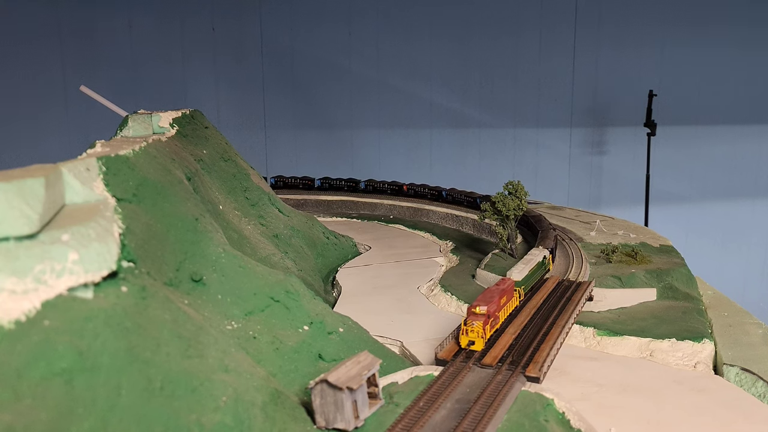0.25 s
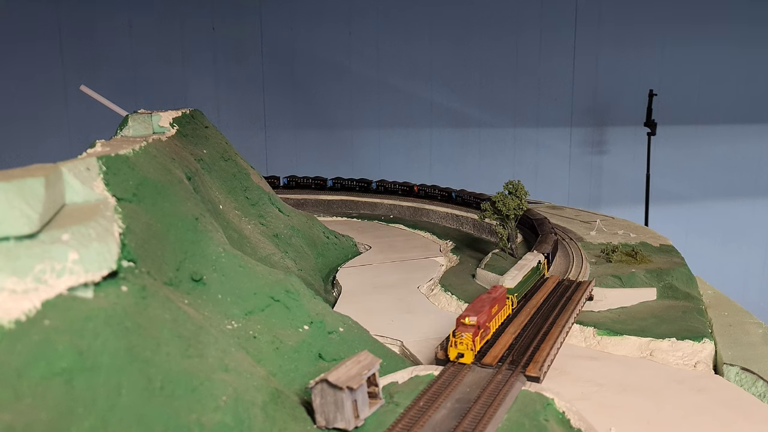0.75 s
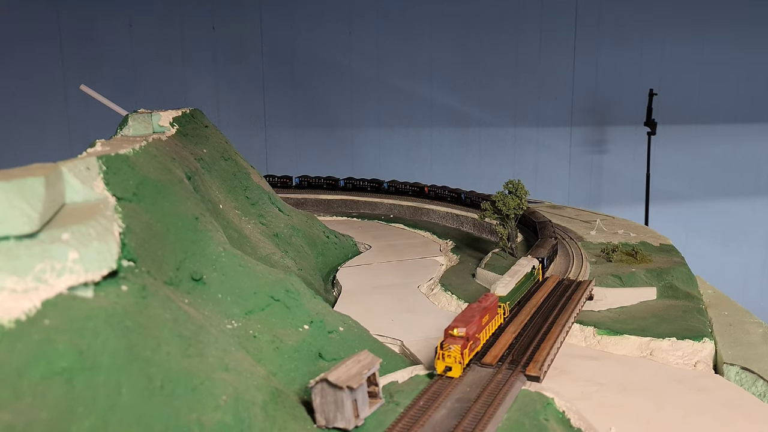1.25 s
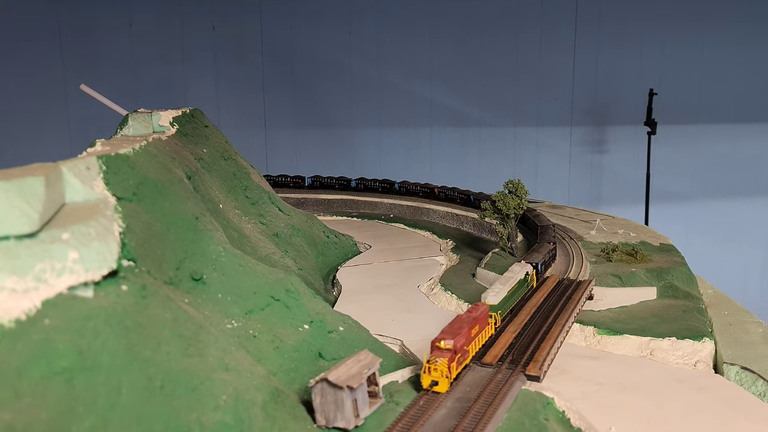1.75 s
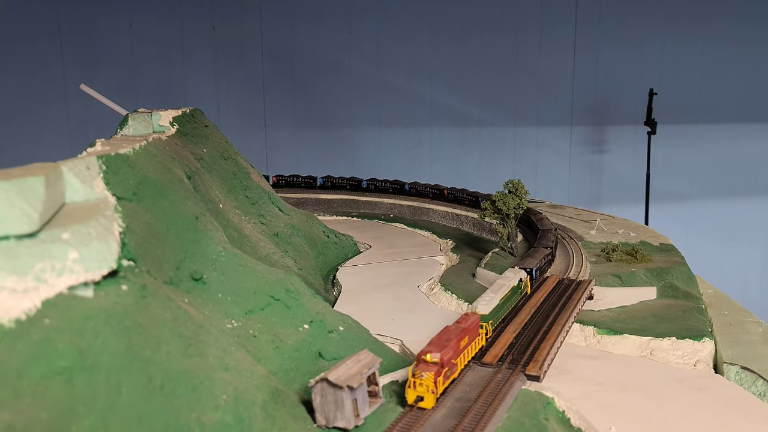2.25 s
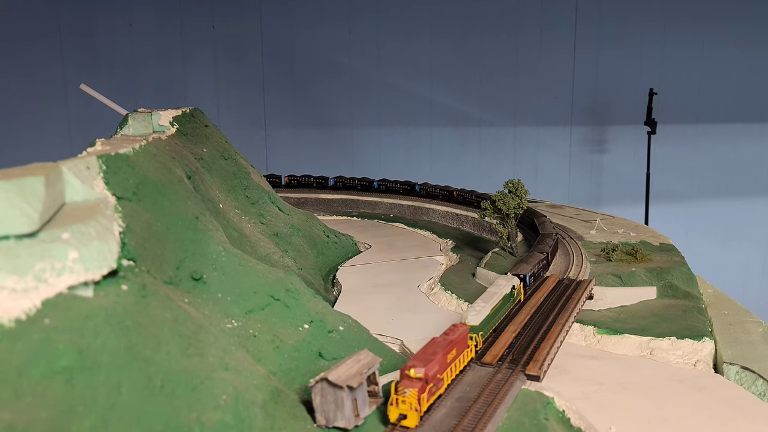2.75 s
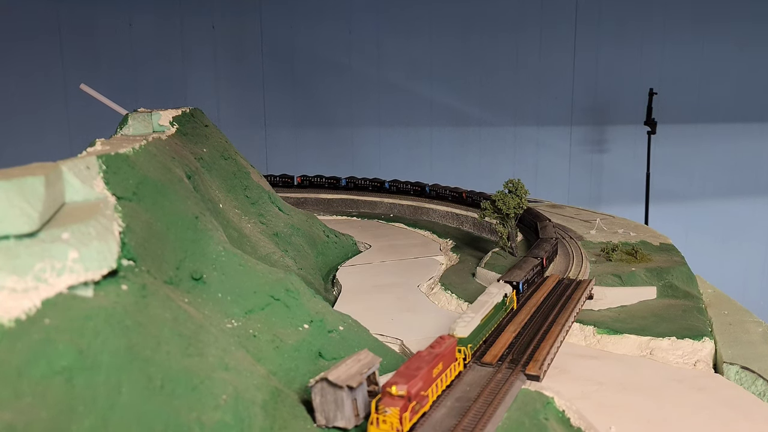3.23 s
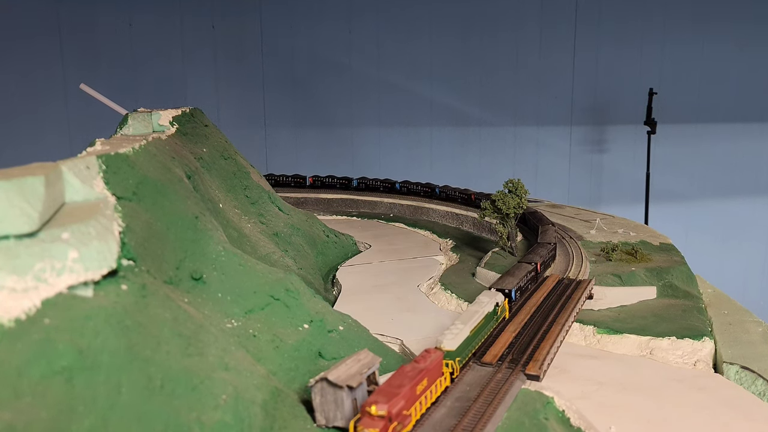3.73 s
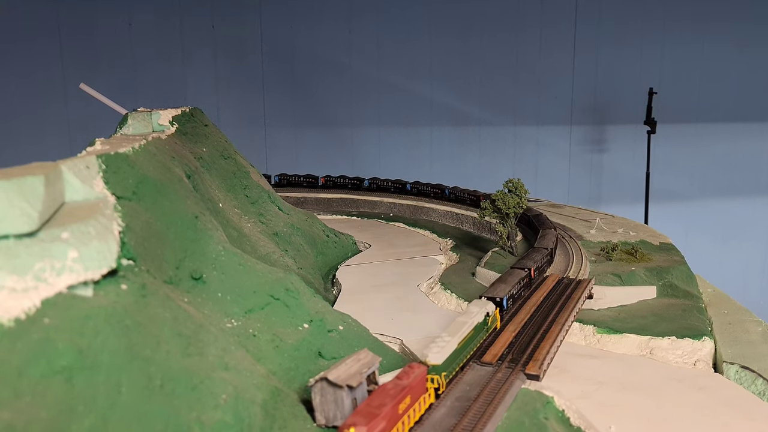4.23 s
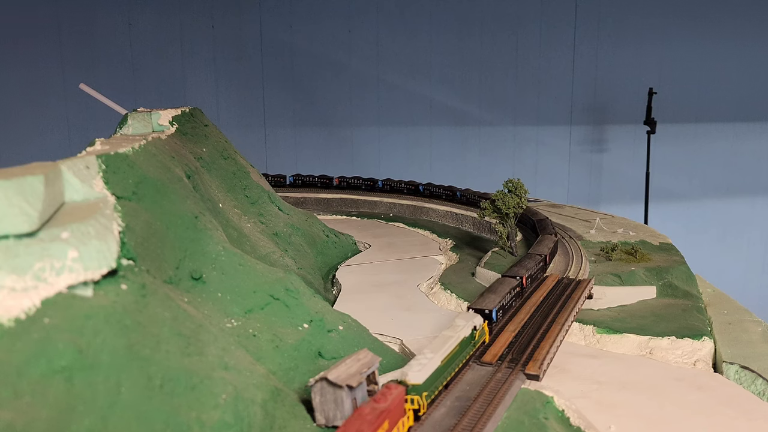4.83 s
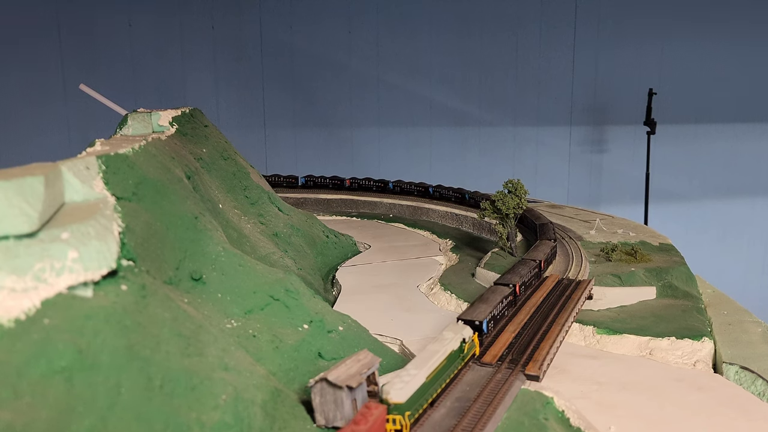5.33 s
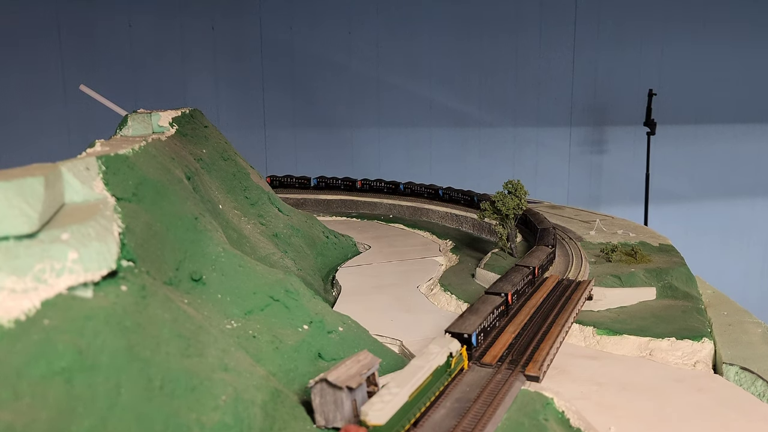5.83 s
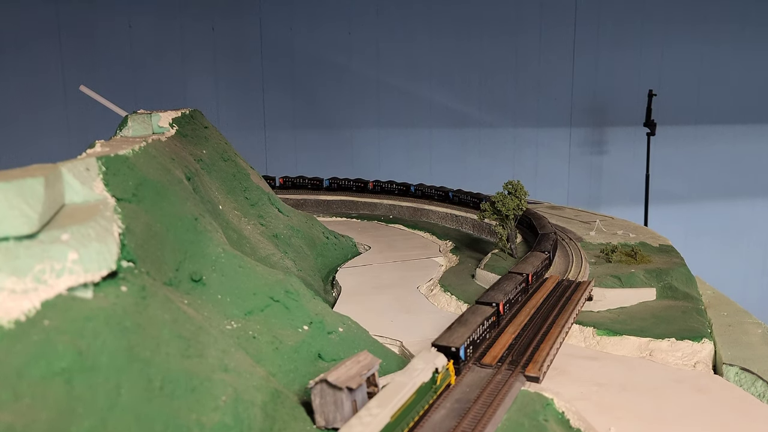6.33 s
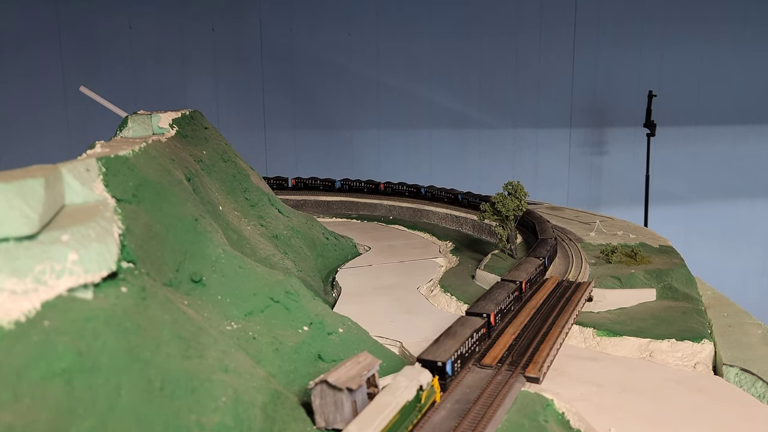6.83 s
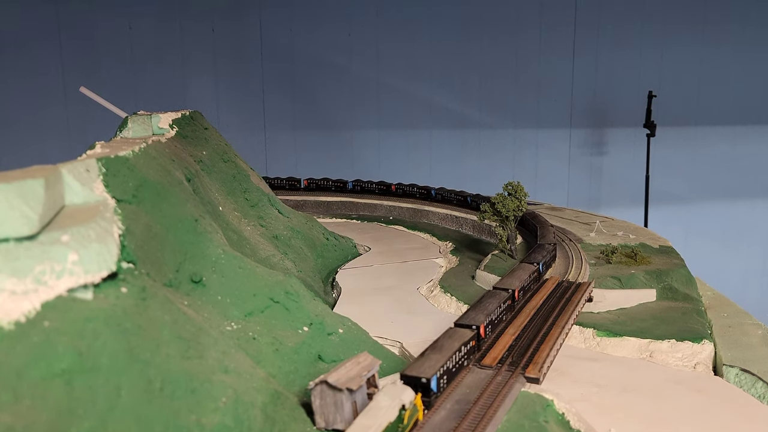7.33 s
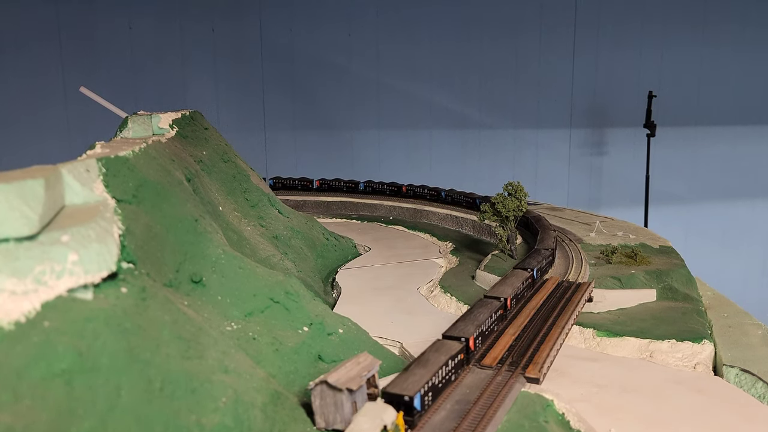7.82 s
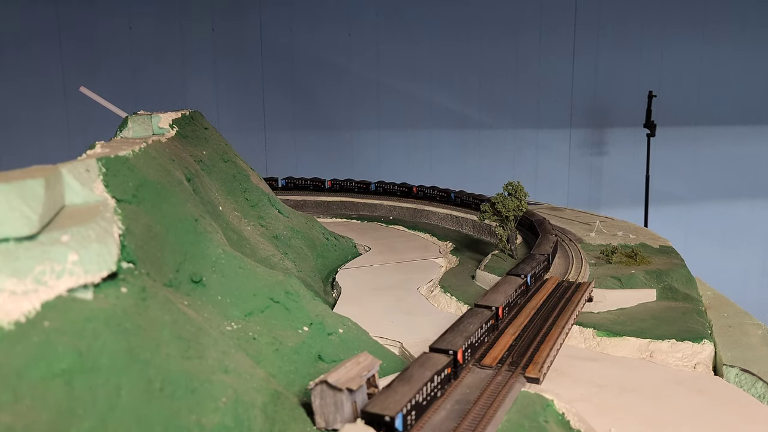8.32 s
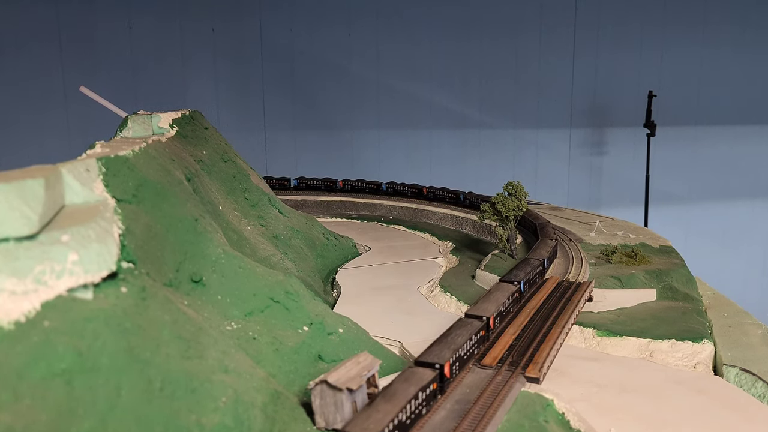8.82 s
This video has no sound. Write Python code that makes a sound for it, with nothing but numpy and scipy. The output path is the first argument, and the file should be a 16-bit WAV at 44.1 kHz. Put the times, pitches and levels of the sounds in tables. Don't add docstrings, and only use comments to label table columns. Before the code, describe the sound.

A small electric model train whirs and rattles steadily closer, its gears hissing and plastic shell buzzing, with soft rail-joint bumps and a few dry ticks.

```python
import sys
import numpy as np
from scipy import signal
from scipy.fft import rfft, irfft, next_fast_len
from scipy.io import wavfile
from scipy.ndimage import uniform_filter1d, map_coordinates

SR = 44100
rng = np.random.default_rng(int(sys.argv[2]) if len(sys.argv) > 2 else 0)


def volts_from_db(level):
    exponent = np.asarray(level, float) / 20
    return 10 ** exponent


def generate_wav(signal):
    frames = np.transpose(np.atleast_2d(signal))
    scaled = np.clip(frames, -1, 1) * 32767
    pcm = np.round(scaled).astype(np.int16)
    wavfile.write(sys.argv[1], SR, pcm)


N = 399987
HOP = 512
SIDES = np.array([[.5], [-.5]])  # left, right share of a left-right dB difference


def unit(x):
    return x / np.sqrt(np.mean(x ** 2) + 1e-20)


def curves(rows):
    s, *cols = np.transpose(rows)
    return [np.interp(np.arange(N) / SR, s, c) for c in cols]


def along(points, hz):
    f, v = np.transpose(points)
    return np.interp(np.log(hz + 1), np.log(f + 1), v)


def wobble(rate_hz):
    coarse = np.arange(0, N + 16, 16)
    knots = rng.standard_normal(int(N * rate_hz / SR) + 4)
    return np.interp(np.arange(N), coarse, map_coordinates(knots, [coarse * rate_hz / SR]))


def filtered(x, response):
    m = next_fast_len(N + 8192)
    return irfft(rfft(x, m) * response(np.fft.rfftfreq(m, 1 / SR)), m)[..., :N]


def patches(shape, hz_bins, frames):
    field = rng.standard_normal(shape)
    for _ in range(2):
        field = uniform_filter1d(field, int(hz_bins), 1)
        field = uniform_filter1d(field, int(frames), 2)
    return unit(field)


APPROACH = {"worm": (-38, -36, -1, -4), "gears": (-34.5, -31.5, 8.5, 0.5),
            "brushes": (-44.5, -43.5, -1, -5), "wheels": (-50.5, -49, -0.5, 1.5),
            "board": (-43, -41.5, -4.5, 0.5), "rumble": (-53.5, -50.5, 0.5, 0)}
SWINGS = {"worm": [(4.4, 0.44, -2.5, 0.5), (6.0, 0.61, -.5, -3.5)], "gears": [(.2, 1, -4, -3),
          (3.2, 0.43, 0, -4.5), (4.9, 0.55, -3, -2)], "brushes": [(4.0, 0.95, 2.5, 7.5),
          (6.0, 1.7, 4.5, 9)], "wheels": [(2.5, 1.6, -1.5, -1.5), (7.5, 1.2, 4.5, 3.5)],
          "board": [(1.5, .55, -2, 0), (5.9, .9, 1, -1.5)], "rumble": [(3.5, 0.85, 1.5, 0),
          (6.6, 0.49, 1.5, 0)]}


def heard_as(part):
    t = np.arange(N) / SR
    first_db, last_db, first_pan, last_pan = APPROACH[part]
    level_db = first_db + (last_db - first_db) * t / t[-1]
    pan_db = first_pan + (last_pan - first_pan) * t / t[-1]
    for s, half_s, gain_db, swing_db in SWINGS[part]:
        bell = np.exp(-((t - s) / half_s) ** 2)
        level_db, pan_db = level_db + gain_db * bell, pan_db + swing_db * bell
    return level_db, pan_db


def hum():
    hum_hz, level_db = 120, -54.0 + 0.34 * wobble(5)
    phase = 2 * np.pi * hum_hz * np.arange(N) / SR + 0.37 * wobble(6)
    return volts_from_db(level_db) * np.sqrt(2) * np.sin(phase)


# (frequency [Hz], density [dB per Hz])
RUMBLE_COLOUR = [(15, -63), (25, -20), (60, -7), (91, -7.5), (113, -7), (150, -4.5), (185, -9),
                 (496, -12.5), (625, -20.5), (800, -17), (1040, -47), (1760, -120)]
# (frequency [Hz], correlation [-1 to 1])
RUMBLE_ALIKE = [(40, 0.74), (120, 0.95), (300, 0.68), (700, 0.2)]


def rumble():
    lumps_db = 0.5

    def colour(hz):
        turn = np.arccos(np.clip(along(RUMBLE_ALIKE, hz), -1, 1)) / 2
        return volts_from_db(along(RUMBLE_COLOUR, hz)) * [np.cos(turn), np.sin(turn)]

    mid, side = filtered(rng.standard_normal((2, N)), colour)
    level_db, pan_db = heard_as("rumble")
    gain = volts_from_db(level_db + lumps_db * wobble(8.8) + SIDES * pan_db)
    return gain * unit(np.array([mid + side, mid - side]))


# (time [s], peak [dB], pitch [Hz], knock re bump [dB])
JOINTS = [(2.550, -37, 104, -22), (2.597, -29, 71.6, -27), (2.702, -40, 100, -21), (2.764, -35, 120, -22),
          (2.826, -38, 120, -18), (3.092, -35, 104, 5), (4.098, -38, 72, -18), (4.165, -41, 60, -16),
          (4.610, -31, 60, -14), (4.816, -34, 90, -16), (4.968, -31, 84, -20), (5.605, -32, 90, -20),
          (6.459, -28, 80, -22), (6.763, -37, 95, -20), (7.730, -35, 90, -22)]


def joint_bumps():
    out, t = np.zeros((2, N + SR)), np.arange(SR // 10) / SR
    left_db = 7
    for s, db, hz, knock_db in JOINTS:
        bump_gain = volts_from_db(db - 2.5 + SIDES * left_db - 60 * t / 0.083)
        bump = bump_gain * (1 - np.exp(-t / .005)) * np.sin(2 * np.pi * hz * t)
        knock_gain = volts_from_db(db + knock_db - 60 * t / 0.028)
        knock = knock_gain * (1 - np.exp(-t / .003)) * np.sin(2 * np.pi * 345 * t)
        out[:, round(s * SR):][:, :len(t)] += bump + knock
    return out[:, :N]


# (time [s], peak [dB])
TICKS = [
    (1.3004, -34),
    (3.2331, -29),
    (5.8396, -26.5),
]


def ticks():
    out, t = np.zeros((2, N + SR)), np.arange(SR // 10) / SR
    for s, db in TICKS:
        snap = np.diff(rng.standard_normal((2, len(t) + 1)), axis=1) * (1 - np.exp(-t / 0.00053))
        out[:, round(s * SR):][:, :len(t)] += volts_from_db(db - 1 - 60 * t / 0.023) * snap
    return out[:, :N]


# (frequency [Hz], width [Hz], level [dB], left-right [dB])
RAILS = [(1012, 14, -61, 0), (1099, 14, -61, 0), (1254, 8, -57, 0), (1350, 10, -55, 0), (1424, 10, -56, 0),
         (1794, 10, -50, 2), (1994, 10, -38, 5), (2525, 10, -47, 0), (3418, 14, -53, -4),
         (7323, 14, -52, -2)]


def rails(near):
    far_below_hz, fade_db = 1200, -9

    def lines(hz):
        total = 0
        for centre, width, db, pan_db in RAILS:
            line = np.sqrt(2 * SR / (np.pi * width)) / (1 + (2 * (hz - centre) / width) ** 2)
            total = total + volts_from_db(db + SIDES * pan_db) * line
        return total

    tones = filtered(rng.standard_normal(N), lines)
    far = filtered(tones, lambda hz: hz < far_below_hz)
    return tones - far + volts_from_db(2.5 + fade_db * near) * far


# (frequency [Hz], lead [rad])
LEAD = [(600, 0.58), (1100, -1.1), (1300, 0.89), (1750, 0.55), (1950, -1.5), (2700, -1.28), (3000, 1.94),
        (4400, 0.89), (4700, -1.77), (15000, -1.5)]
# (frequency [Hz], share [0-1])
ALIKE = [(700, 0.81), (1100, 0.8), (1450, 0.74), (1850, 0.41), (2250, 1), (2900, 0.32), (4000, 0.1),
         (4500, 0.74), (5200, 0.79), (6400, 0.47), (7000, 0.6), (7700, 0.25), (9000, 0.27), (14000, 0.14)]
# (time [s], half length [s], frequency [Hz], gain [dB])
GLINTS = [(.2, .4, 8000, -5), (.9, 0.78, 4830, 7), (1.2, 0.21, 6140, 12), (2.3, 0.72, 4070, 8),
          (2.5, .7, 5420, 3.5), (3.2, 0.49, 4850, 5.5), (3.3, 0.56, 2596, 10), (5.3, 0.56, 3970, 1),
          (5.6, 1.2, 7600, 4.5), (5.8, 0.52, 5560, -5), (6.5, 1.2, 2820, 6), (7.1, 1.6, 4250, -6.5),
          (7.5, .4, 3460, 4), (8, 1.8, 790, -10), (8.3, .6, 5660, 4), (8.4, 1.1, 2700, -6),
          (8.3, 1, 2030, -2.5), (4.6, .4, 2900, 4), (1.5, .8, 1400, -4), (4.6, .6, 4900, -4.5),
          (6.1, .5, 4900, -6), (6.9, .7, 6200, 2.5), (8, 0.51, 6460, 2.5), (8.2, .7, 5320, -3)]


def shaken(modes, level_db, pan_db, near, drive, echo, drift_db):
    lead_ms_per_s = .025
    glint_width, glint_slide_per_s = 0.039, -.022
    hz, t, z = signal.stft(drive * rng.standard_normal((3, N)), SR, nperseg=2 * HOP)
    at = np.minimum((t * SR).astype(int), N - 1)
    rows = (hz > modes[0][0] - 2500) & (hz < modes[-1][0] + 2500)
    hz, near = hz[rows, None], near[at]

    power = np.zeros((2, len(hz), len(t)))
    for centre, width, far_db, near_db, far_pan, near_pan in modes:
        mode_pan = far_pan + near * (near_pan - far_pan)
        mode_db = far_db + near * (near_db - far_db) + SIDES * mode_pan
        power += volts_from_db(2 * mode_db)[:, None] / (1 + (2 * (hz - centre) / width) ** 2) ** 1.99
    power *= volts_from_db(2 * drift_db * patches(power.shape, 3.1, 41))
    for s, half_s, centre, gain_db in GLINTS:
        off = (hz / centre - 1 - glint_slide_per_s * (t - s)) / glint_width
        power *= volts_from_db(2 * gain_db * np.exp(-off ** 2 - ((t - s) / half_s) ** 2))

    echo_ms = 2.6 + .15 * t + .3 * SIDES[:, None]
    depth = np.clip(echo * (1 + .7 * patches(power.shape, 15, 60)), 0, .9)
    power *= 1 + depth * np.cos(2 * np.pi * hz * echo_ms / 1e3)
    gain = np.sqrt(power / power.mean(axis=1, keepdims=True)) * volts_from_db(SIDES * pan_db[at])[:, None]

    phase = along(LEAD, hz) + 2 * np.pi * hz * lead_ms_per_s * t / 1e3
    share = np.clip(along(ALIKE, hz), 0, 1)
    cross = 2 * share * gain[0] * gain[1] * np.cos(phase)
    both = (gain[0] ** 2 + gain[1] ** 2 + cross).sum(axis=0) / (4 * HOP)
    direct = np.sqrt(share) * z[0, rows] * np.exp(1j * SIDES[:, None] * phase)
    ports = np.zeros_like(z[1:])
    ports[:, rows] = gain / np.sqrt(both) * (direct + np.sqrt(1 - share) * z[1:, rows])
    return volts_from_db(level_db) * signal.istft(ports, SR, nperseg=2 * HOP)[1][:, :N]


# (frequency [Hz], width [Hz], far level [dB], near level [dB],
# far left-right [dB], near left-right [dB])
BOARD = [(742, 205, -8, -15, 6, 2.4), (990, 266, -6, -16, -3, 7), (1327, 167, -7, -1.5, -10, -3.5),
         (1562, 365, 3, -1, -1.2, 3.5)]


def board(near, uneven):
    return shaken(BOARD, *heard_as("board"), near, unit(volts_from_db(0.15 * uneven)), echo=0.098, drift_db=1.7)


WHEELS = [(9270, 1050, -3.5, 3, 16.5, 8), (10550, 1100, -4.5, 7, -4, 8), (11590, 980, -7, 0, -10, -5),
          (12460, 910, -6, 0.5, 4, -3), (13500, 1100, -6.5, -9, -8, -6), (14500, 1300, -9.5, -9, -1, -4)]


def wheels(near, throb, grit):
    drive = unit(volts_from_db(0.3 * throb + 0.66 * wobble(8) + .8 * grit))
    return shaken(WHEELS, *heard_as("wheels"), near, drive, echo=0.41, drift_db=0.5)


BRUSHES = [(7344, 134, -2, -5.5, -3, 1), (7600, 1200, -10, -15, 0, 2), (8195, 180, -15, -19, -10, -15)]


def brushes(near, teeth):
    drive = unit(teeth * volts_from_db(0.83 * wobble(8.2)))
    return shaken(BRUSHES, *heard_as("brushes"), near, drive, echo=0.35, drift_db=3.5)


WORM = [(3036, 230, -1.5, -6, 3, 7), (3336, 315, -2.5, 9, 6.5, 3), (3782, 270, 1, 4.5, 18.5, -7),
        (4072, 206, 6, -14.5, -3.5, -17), (4417, 430, -5, -3, 28, -8)]


def worm(near, teeth):
    return shaken(WORM, *heard_as("worm"), near, teeth, echo=0.74, drift_db=2.2)


GEARS = [(4888, 366, 3.5, 0, 8.8, 6), (5465, 420, 6, -0.5, 1.6667, -20), (5953, 155, -1.5, 1.5, 23.3, 2.5),
         (6267, 370, -2.5, 13, 20, -25), (6603, 230, -4.5, -4.5, 21, 1)]


def gears(near, teeth):
    return shaken(GEARS, *heard_as("gears"), near, teeth, echo=.45, drift_db=1.7)


SHELL = [(1798, 144, -3.5, -18.5, 7, 9), (2088, 233, 3, -14, -14.5, 28.5), (2209, 167, -2.5, -5.5, -14, 14),
         (2269, 176, -11.5, 0, -4, -4.5), (2476, 144, -2, -12.5, -3, 15.5),
         (2747, 250, -8.5, -21.5, -14.5, 19.5)]
# (time [s], gain [dB])
JOLTS = [(1.06, 2), (2.14, 2.5), (4.22, 3), (4.68, 5), (4.88, 3), (4.97, 3), (5.025, 4), (5.29, 3),
         (5.38, 2.5), (5.46, 2.5), (6.425, 3), (6.49, 3), (6.84, 3), (7.45, 1.5), (7.58, 3.5), (8.18, 3),
         (8.36, 3), (8.917, 2), (8.944, 1.5)]


def shell(level_db, pan_db, near, facing, throb, uneven):
    surge_db, surge_growth, jolt_half_s = 0.74, .2, .015
    t = np.arange(N) / SR
    surges_db = surge_db * (1 + surge_growth * near) * wobble(28)
    for s, gain_db in JOLTS:
        surges_db = surges_db + gain_db * np.exp(-((t - s) / jolt_half_s) ** 2)
    drive = unit(volts_from_db(0.25 * throb + .5 * uneven))
    return shaken(SHELL, level_db + surges_db, pan_db, facing, drive, echo=0.24, drift_db=1.1)


# (time [s], level [dB], left-right [dB])
ENGINE = [(0, -31.5, .5), (.7, -34, 1), (1.0, -30, 0.5), (1.6, -30, -1), (2.3, -30, -1.5),
          (2.85, -30.5, -5), (3.9, -24.5, -2), (4.3, -23.5, -3), (4.55, -24, -2.5), (4.9, -22.5, -2.5),
          (5.7, -24, .5), (6.6, -23.5, 0), (7.4, -23, 0), (7.7, -22.5, -2), (8.05, -22, -5),
          (8.4, -20.5, -6.5), (9.07, -20, -8)]
# (time [s], nearness [0-1], shell turned to the ports [0-1])
PATH = [(0, 0.14, 0.16), (.7, 0.02, 0.57), (1.5, 0.09, 0.45), (2.3, 0.17, 0), (3, 0.37, 0.32),
        (3.7, 0.27, 0.56), (5.3, 0.34, 0.47), (6, 0.6, 0.47), (7.2, 0.6, 0.63), (8, 0.6, 0.95),
        (9.07, 0.61, 1)]
# (multiple of shaft rate [1], depth [dB])
SHAFT = [(1, .5), (2, .6), (3, .35), (4, .15)]


def train():
    shaft_hz = 15.9
    shell_db, shell_pan_db = curves(ENGINE)
    near, facing = curves(PATH)
    angle = 2 * np.pi * shaft_hz * np.arange(N) / SR + 0.72 * wobble(2.1)
    throb = sum(depth * np.cos(k * (angle + k)) for k, depth in SHAFT)
    uneven, grit = wobble(14), wobble(400)
    teeth = unit(volts_from_db(1.27 * throb + 0.68 * uneven + .5 * grit))
    out = board(near, uneven) + wheels(near, throb, grit)
    out += brushes(near, teeth) + worm(near, teeth) + gears(near, teeth)
    out += volts_from_db(0.4 * (shell_db - shell_db.mean())) * rails(near)
    return out + shell(shell_db, shell_pan_db, near, facing, throb, uneven)


def scene():
    return rumble() + hum() + joint_bumps() + ticks() + train()


# (frequency [Hz], margin [dB])
MARGIN = [(2500, 30), (4000, 13), (7000, 11), (8200, 8), (8500, -.5), (11500, -.5), (12500, 1.5),
          (14000, 1), (15300, -3)]


def muted(dry):
    band_bins, lead_in = 2, 2 * HOP - 859
    padded = np.pad(dry, ((0, 0), (lead_in, 0)))
    hz, _, z = signal.stft(padded, SR, "cosine", nperseg=4 * HOP)
    bands = z[:, :-1].reshape(2, -1, band_bins, z.shape[2])
    level_db = 10 * np.log10((abs(bands) ** 2).mean(axis=(0, 2)) + 1e-20)
    mask_db = uniform_filter1d(uniform_filter1d(level_db, size=41, axis=0), size=9, axis=1)
    margin_db = along(MARGIN, hz[:-1:band_bins])[:, None]
    margin_db = margin_db + 2.6 * patches((1,) + level_db.shape, 9, 3)[0]
    kept = (level_db > mask_db - margin_db)[None, :, None]
    z[:, :-1] = (bands * kept).reshape(2, -1, z.shape[2])
    return signal.istft(z, SR, "cosine", nperseg=4 * HOP)[1][:, lead_in:lead_in + N]


def roll_off(x):
    return signal.sosfilt(signal.butter(12, 15500, fs=SR, output="sos"), x)


def record(dry):
    return roll_off(muted(dry))


dry = scene()
out = record(dry)
generate_wav(out)
```